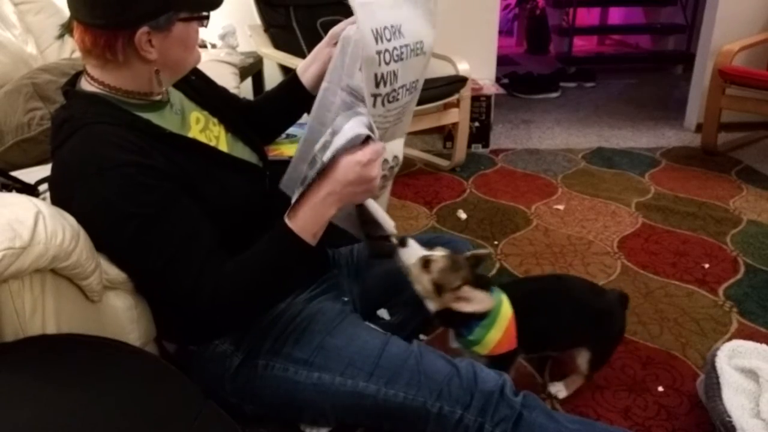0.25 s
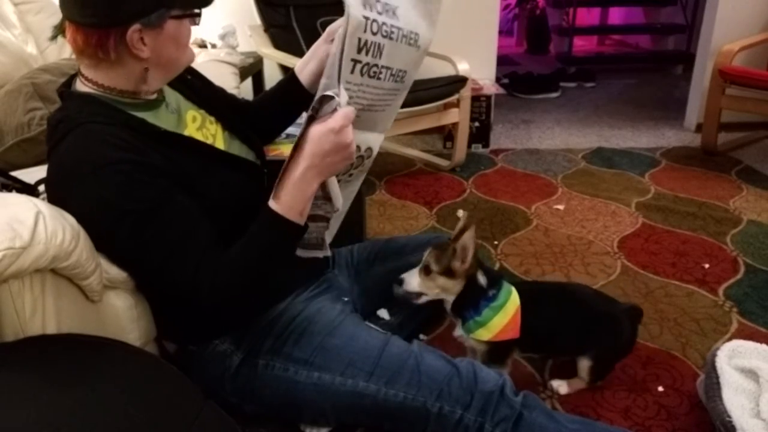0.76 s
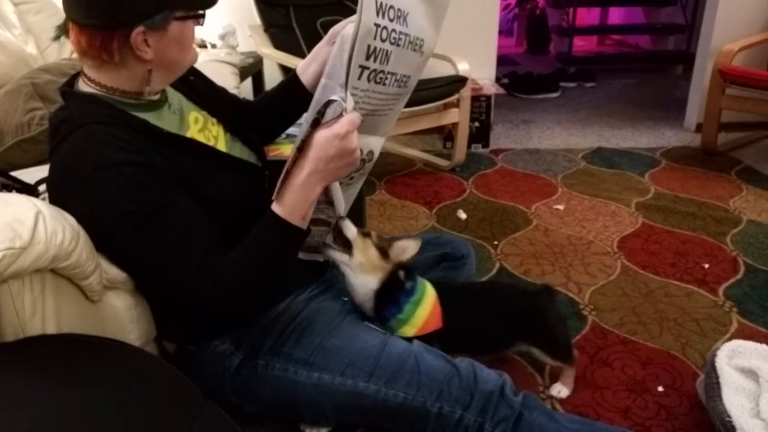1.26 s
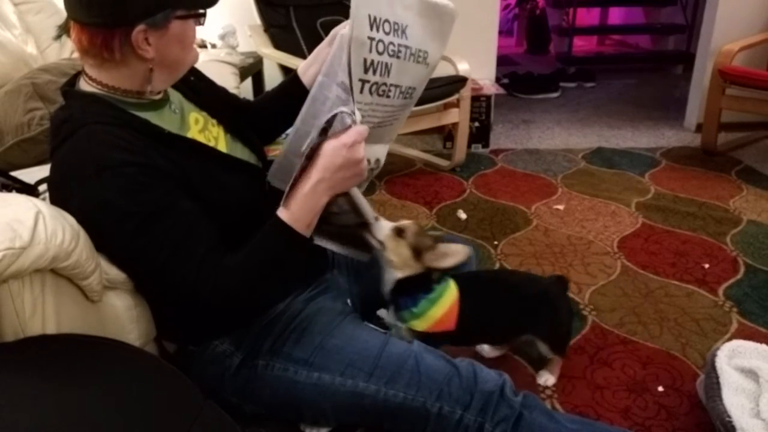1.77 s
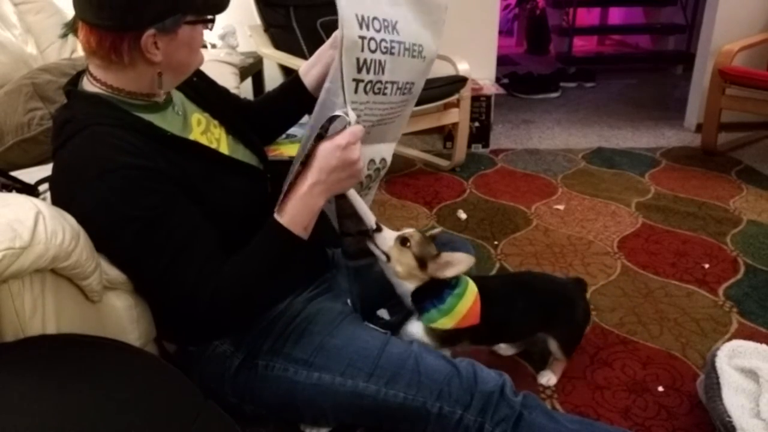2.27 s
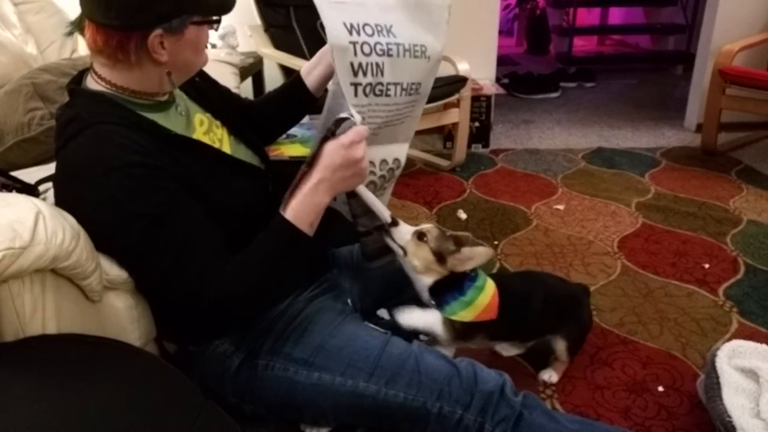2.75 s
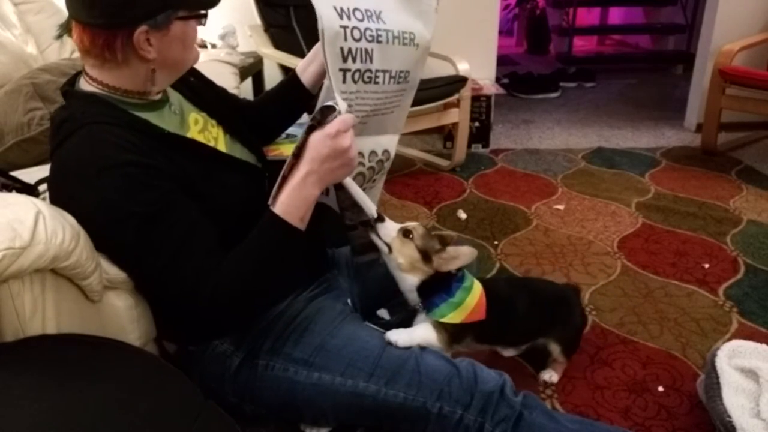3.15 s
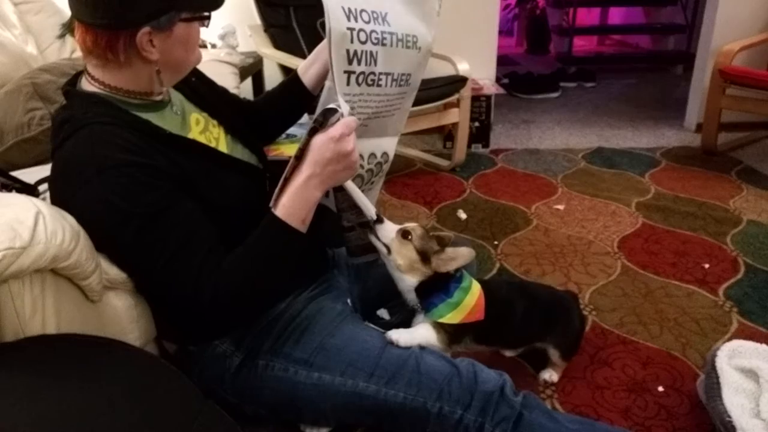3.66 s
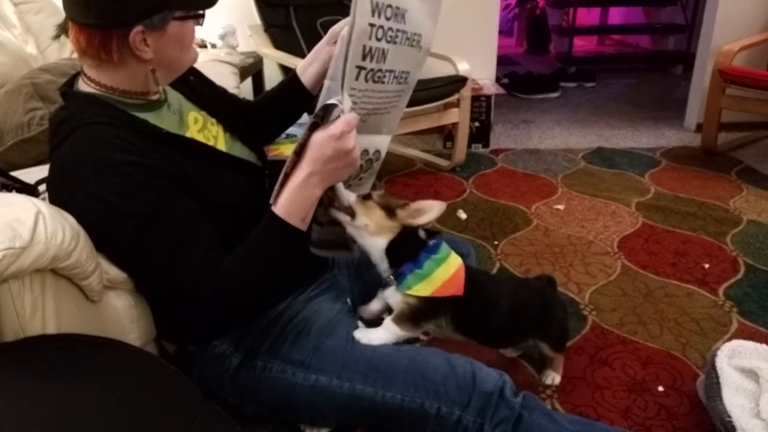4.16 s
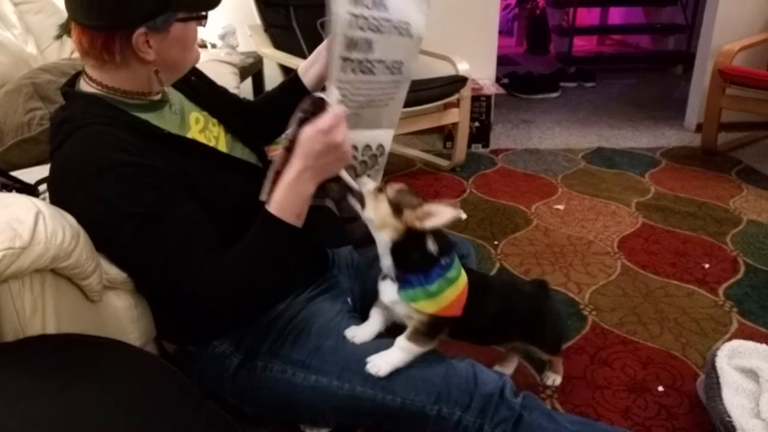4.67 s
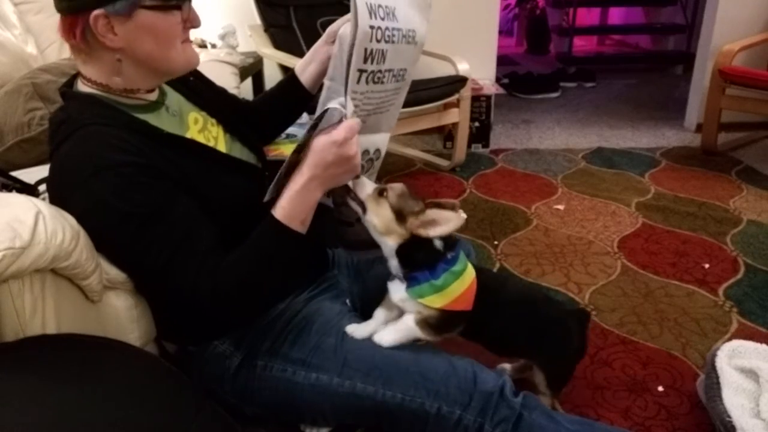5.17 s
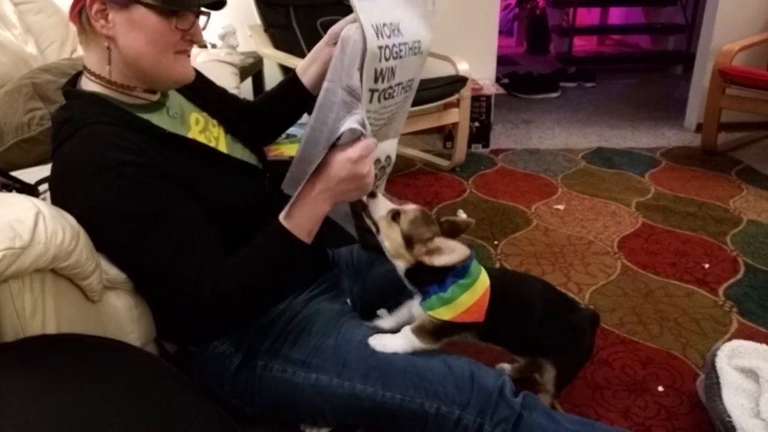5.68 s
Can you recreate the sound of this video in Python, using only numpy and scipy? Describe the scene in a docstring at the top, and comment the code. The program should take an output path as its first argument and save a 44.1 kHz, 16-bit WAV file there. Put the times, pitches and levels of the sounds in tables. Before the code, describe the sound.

In a living room, a small metal tag tinkles faintly and a puppy tears a strip off a newspaper in one quick rip. The sheet is then tugged and crumpled in bursts of rustling. After a short lull comes a denser run of crackles and sharp snaps as the paper is bitten. Soft, dull thuds come now and then, over a low hum, rumble and microphone hiss.

```python
"""A carpeted living room, where a puppy tugs at a newspaper that someone holds. A strip rips off in a dense
run of breaking fibres; then the sheet is pulled, crumpled and bitten, crackling with tiny fractures and
buckling with sharp snaps. A small metal tag tinkles faintly, and soft shoves thud against lap and floor.
The walls answer the paper and the tag; underneath lie a low appliance hum, rumble and microphone hiss."""
import sys
import numpy as np
from scipy import signal
from scipy.fft import rfft, irfft, next_fast_len
from scipy.io import wavfile
from scipy.ndimage import map_coordinates

SR = 44100
rng = np.random.default_rng(int(sys.argv[2]) if len(sys.argv) > 2 else 0)


def int16_out(signal):
    """Quantize to a 16-bit WAV file."""
    q = np.round(np.clip(np.atleast_2d(signal).T, -1, 1) * 32767)
    wavfile.write(sys.argv[1], SR, q.astype(np.int16))


N = 261072
TIME = np.arange(N) / SR

# tone of the hiss and of the low rumble: frequency_hz, density_db
HISS_EQ = [(120, -18), (200, -9), (320, -4), (500, -7), (800, -9.5), (1500, -13), (3500, -14.5),
           (8000, -14.5), (15700, -15)]
RUMBLE_EQ = [(7.1, -17.5), (12, 6), (26, -8.5), (43, -12), (75, -11.5), (97, -17), (141, -19.5),
             (300, -24.5), (390, -67.5), (660, -120)]
# partials of the appliance hum: pitch_hz, level_db
HUM_PARTIALS = [(73, -78), (145.6, -76), (219, -100.5)]
# the sheet stirring in the hands: start_s, end_s, level_db
SHEET_STIRS = [(0.0, 0.9, -69), (1.0, 2.453, -76), (4.203, 5.92, -70.5)]
# pulls on the sheet, each a swell and a fade: peak_s, rise_s, fall_s, level_db, brightness_db
SHEET_PULLS = [(0.375, 0.1, 0.13, -64, 4), (0.503, 0.012, 0.036, -62, 5.5), (0.96, 0.05, 0.14, -70, 2),
               (1.18, 0.037, 0.061, -75.5, 9), (1.616, 0.037, 0.06, -64, -15), (1.83, 0.13, 0.13, -57, 1.5),
               (1.94, 0.055, 0.092, -45.5, -1.5), (2.02, 0.042, 0.05, -44, -3),
               (2.1, 0.035, 0.062, -48, -0.5), (2.17, 0.054, 0.18, -60, 1.5),
               (2.72, 0.058, 0.078, -62.5, -5.5), (2.775, 0.15, 0.12, -62, 3),
               (2.92, 0.038, 0.071, -59, 1.5), (4.19, 0.11, 0.1, -68.5, 1),
               (4.46, 0.025, 0.063, -57.5, 1.5), (4.65, 0.06, 0.072, -66, -7),
               (4.715, 0.025, 0.026, -70, 7), (4.81, 0.06, 0.11, -72, -16), (5.065, 0.053, 0.11, -61.5, -2),
               (5.435, 0.026, 0.044, -64.5, 5.5), (5.63, 0.047, 0.034, -57, -1),
               (5.715, 0.025, 0.027, -67.5, -5), (5.8, 0.018, 0.031, -64.5, 1), (5.89, 0.02, 0.04, -67, 0)]
# the paper's three voices, from wide panels through creases to single fibres: frequency_hz, density_db
FLUTTER_EQ = [(40, -10), (120, -4.5), (280, -1.5), (480, 2), (650, 0.5), (900, -1), (1400, -1), (2100, -3),
              (3200, -11), (7000, -49)]
CRINKLE_EQ = [(600, -48.5), (1500, -4), (2400, 1), (3400, 3), (4600, -0.5), (6500, -7), (9000, -17.5),
              (16000, -49)]
FIZZ_EQ = [(2500, -28), (5000, -2), (6800, 1), (8500, 1.5), (10500, 1), (13000, -2), (16000, -4)]
# the slack sheet flapping: frequency_hz, density_db
FLAP_EQ = [(30, -31), (80, 9), (180, 0.5), (380, 4), (600, -18.5), (1500, -51)]
# the sheet buckling: start_s, pop_hz, pop_q, pop_db, crack_db, fizz_db
BUCKLES = [(0.064, 1400, 0.51, -69, -65, -79), (1.645, 1000, 0.7, -66, -55, -75),
           (2.125, 1250, 0.8, -52.5, -51, -73), (2.43, 810, 5.7, -67, -79, -82),
           (2.474, 3060, 4.3, -67, -69, -81.5), (3.233, 1500, 1.0, -80, -71.5, -77),
           (3.493, 980, 0.63, -70, -74, -82), (3.638, 1300, 0.8, -90, -73.5, -74.5),
           (4.289, 1780, 0.38, -61.5, -53, -54.5), (4.335, 1490, 0.3, -57.5, -63, -64),
           (4.407, 885, 0.14, -45.5, -51.5, -49.5), (4.564, 1220, 0.32, -54.5, -54.5, -54),
           (4.614, 1790, 0.96, -56, -66, -65), (4.764, 1700, 0.43, -63.5, -69, -85),
           (5.094, 950, 0.27, -53.5, -56, -62), (5.19, 1010, 1.2, -48, -45, -53),
           (5.315, 900, 0.95, -49, -60, -57.5), (5.507, 1910, 1.4, -66, -63, -74),
           (5.589, 1200, 4.8, -51.5, -55.5, -57.5), (5.623, 1070, 1.8, -59, -60.5, -69),
           (5.783, 1890, 1.3, -62, -73, -82), (5.913, 1240, 10, -53, -64, -67)]
# one crease cracking: ratio_to_centre, density_db
CREASE_EQ = [(.15, -21), (.5, -12), (.78, -2), (1.2, -1.5), (1.8, -4.5), (4, -27)]
# light contacts on the tag: start_s, level_db
TAG_HITS = [(0.1191, -51), (0.1351, -45.5), (0.3574, -51), (0.7864, -58), (2.2874, -51), (2.3017, -61)]
# the tag's ringing modes: pitch_hz, level_db, t60_s
TAG_MODES = [(8450, -17, 0.068), (10400, -26, .12), (15000, 3.5, 0.051)]
# flutter, crinkle and fizz of the rip, a row each: level_db, sag_db_per_s
RIP_LAYERS = [(-46.5, 18), (-39.5, 38), (-36.5, 18)]
# dull shoves against lap and floor: start_s, level_db
SHOVES = [(0.599, -45.5), (1.546, -51.5), (2.537, -54), (4.42, -59), (4.75, -53.5), (5.166, -44)]

RIP_START_S, RIP_FREE_S = 0.578, 0.73  # the strip gives way, then comes free


def amp(db):
    """Decibels to gain."""
    return 10 ** (np.asarray(db) / 20)


def unit(x):
    """Scale to rms 1."""
    return x / np.sqrt(np.mean(x ** 2) + 1e-20)


def wobble(rate):
    """A smooth random curve with rate knots a second."""
    steps = np.arange(0, N / SR * rate + 1, 1 / 8)
    knots = rng.standard_normal(int(steps[-1]) + 4)
    return np.interp(TIME * rate, steps, map_coordinates(knots, [steps]))


def coloured(x, eq, size=4096):
    """Minimum-phase filter through (frequency_hz, level_db) points on a log frequency axis."""
    hz, db = np.transpose(eq)
    curve_db = np.interp(np.log(np.fft.rfftfreq(size, 1 / SR) + 1), np.log(hz + 1), db)
    cepstrum = irfft(np.log(amp(curve_db)))
    cepstrum[1:size // 2] *= 2
    cepstrum[size // 2 + 1:] = 0
    return signal.oaconvolve(x, irfft(np.exp(rfft(cepstrum))))[:len(x)]


def add(track, start_s, sound):
    """Mix a sound into the track from start_s on."""
    part = track[max(round(start_s * SR), 0):][:len(sound)]
    part += sound[:len(part)]


def gate(start_s, end_s, edge_s):
    """Full gain while a movement lasts, with a fade of edge_s on either side."""
    return np.interp(TIME, [start_s - edge_s, start_s, end_s, end_s + edge_s], [0, 1, 1, 0])


def swell(peak_s, rise_s, fall_s, depth_db=13, shape=1.08):
    """A gain of 1 at peak_s, depth_db lower at the ends of rise and fall; shape 1 is pointed, 2 round."""
    away = np.abs(TIME - peak_s) / np.where(TIME < peak_s, rise_s, fall_s)
    return amp(-depth_db * np.minimum(away, 5) ** shape)


def rumble(rest_db=-60, rip_db=-54, shove_trim_db=-7):
    """A low bed that rises as bodies shift, in the rip and around each shove."""
    shoves = [swell(at_s, rise_s=0.14, fall_s=0.14) * amp(db + shove_trim_db) for at_s, db in SHOVES]
    recoil = amp(rip_db) * gate(RIP_START_S, RIP_FREE_S, edge_s=0.026)
    gain = np.sqrt(amp(rest_db) ** 2 + recoil ** 2 + np.sum(np.square(shoves), axis=0))
    return gain * unit(coloured(rng.standard_normal(N), RUMBLE_EQ, size=16384))


def appliance_hum(waver_db=3.0, drift_rad=0.44):
    """Low partials, each wavering a little in level and phase."""
    hum = np.zeros(N)
    for hz, db in HUM_PARTIALS:
        gain = np.sqrt(2) * amp(db + waver_db * wobble(3.88))
        hum += gain * np.sin(2 * np.pi * hz * TIME + drift_rad * wobble(2.85))
    return hum


def room_tone(hiss_db=-65):
    """The bed under the action: steady microphone hiss over rumble and hum."""
    hiss = amp(hiss_db) * unit(coloured(rng.standard_normal(N), HISS_EQ))
    return hiss + rumble() + appliance_hum()


def crackle(eq, per_s, spread_db, clump_db):
    """Tiny fractures of unequal size, louder in clumps; rms 1."""
    at = np.flatnonzero(rng.random(N) < per_s / SR)
    size_db = spread_db * np.minimum(rng.exponential(size=N)[at], 4)
    polarity = np.sign(rng.random(N)[at] - 0.5)
    clicks = np.zeros(N)
    clicks[at] = polarity * amp(size_db + clump_db * wobble(70)[at])
    return unit(coloured(clicks, eq))


def paper(gains, trims_db, per_s, spread_db, clump_db):
    """Panels flutter, creases crinkle and fibres fizz, each as its own stream of fractures."""
    voices = zip(gains, trims_db, (FLUTTER_EQ, CRINKLE_EQ, FIZZ_EQ))
    return sum(gain * amp(db) * crackle(eq, per_s, spread_db, clump_db) for gain, db, eq in voices)


def handling(flutter_tilt=0.63, stir_crinkle_db=-3.5, waver_db=1.8):
    """Flutter, crinkle and fizz gains: pulls over faint stirring; bright pulls trade flutter for fizz."""
    stir = sum(amp(db) * gate(start_s, end_s, edge_s=0.12) for start_s, end_s, db in SHEET_STIRS)
    stir *= amp(waver_db * wobble(12))
    power = np.outer(amp([0, stir_crinkle_db, 0]), stir) ** 2
    for peak_s, rise_s, fall_s, db, bright_db in SHEET_PULLS:
        balance = amp([db - flutter_tilt * bright_db, db, db + bright_db])
        power += np.outer(balance, swell(peak_s, rise_s, fall_s)) ** 2
    return np.sqrt(power)


def rustle(flap_db=-12):
    """Pulls crumple the sheet in a loose crackle; the slack sheet also flaps as a whole."""
    gains = handling()
    flap = amp(flap_db) * gains[0] * crackle(FLAP_EQ, per_s=600, spread_db=0.5, clump_db=4.5)
    return flap + paper(gains, trims_db=(1.37, 1, 2), per_s=2200, spread_db=4, clump_db=2.5)


def wall_echoes(count, arrival_s=0.011, near_db=-8, body_t60_s=0.26, treble_t60_s=0.19, split_hz=6000):
    """Room tails of energy 1: weak echoes off near furniture, then the dense return from the walls."""
    t = np.arange(SR // 4) / SR
    noise = rng.standard_normal((count, len(t)))
    body = signal.lfilter(*signal.butter(1, split_hz, fs=SR), noise)
    tails = body * amp(-60 * t / body_t60_s) + (noise - body) * amp(-60 * t / treble_t60_s)
    tails *= amp(np.interp(t, [0, arrival_s / 2, arrival_s], [near_db, near_db, 0]))
    return tails / np.linalg.norm(tails, axis=1, keepdims=True)


def in_room(x, wet_db, size=2500):
    """A moving source meets a new pattern of echoes every moment; energy is kept."""
    pieces = np.pad(x, (0, -N % size)).reshape(-1, size)
    tails, wet = wall_echoes(len(pieces)), np.zeros(N)
    for k in np.flatnonzero(pieces.any(axis=1)):
        add(wet, k * size / SR, signal.fftconvolve(pieces[k], tails[k]))
    return (x + amp(wet_db) * wet) / np.hypot(1, amp(wet_db))


def snaps(pop_trim_db=1, fizz_trim_db=1.5, wet_db=4.5, rise_s=0.001, crack_t60_s=0.01):
    """A panel flips through: it pops for a few cycles while its crease cracks and fibres break."""
    track, t = np.zeros(N), np.arange(SR // 20) / SR
    flip = signal.unit_impulse(len(t))
    for start_s, pop_hz, pop_q, pop_db, crack_db, fizz_db in BUCKLES:
        panel = signal.lfilter(*signal.iirpeak(pop_hz, max(pop_q, pop_hz / SR * 10), SR), flip)
        pop = amp(pop_db + pop_trim_db) * unit(coloured(panel, FLUTTER_EQ))
        crack_hz = 3460 * 2 ** ((crack_db + 55.5) / 55)  # harder is brighter: an octave per 55 dB
        crease_eq = [(ratio * crack_hz, db) for ratio, db in CREASE_EQ]
        bright_layers = [(crease_eq, crack_db), (FIZZ_EQ, fizz_db + fizz_trim_db)]
        fractures = rng.standard_normal(len(t)) * (1 - np.exp(-t / rise_s)) * amp(-60 * t / crack_t60_s)
        crack = sum(amp(db) * unit(coloured(fractures, eq)) for eq, db in bright_layers)
        add(track, start_s, pop + crack)
        # the walls gather what the sheet sends in all directions, so their colour is even
        sends = [pop] + [amp(db) * unit(coloured(flip, eq)) for eq, db in bright_layers]
        echoes = signal.fftconvolve(sends, wall_echoes(len(sends)), axes=1).sum(axis=0)
        add(track, start_s, amp(wet_db) * echoes)
    return track / np.hypot(1, amp(wet_db))


def tag_tinkle(trim_db=2, scatter_db=0.99):
    """Each light contact rings the metal tag's high modes at new strengths."""
    track, t = np.zeros(N), np.arange(SR // 4) / SR
    for start_s, hit_db in TAG_HITS:
        ring = sum(amp(db + rng.normal(0, scatter_db) - 60 * t / t60_s) * np.sin(2 * np.pi * hz * t)
                   for hz, db, t60_s in TAG_MODES)
        add(track, start_s, amp(hit_db + trim_db) * ring)
    return track


def rip(release_db_per_s=334, jerk_db=7, jerk_s=0.013, low_cut_hz=750):
    """Fibres break in a dense run that slackens until the strip is free; the taut sheet has little bass."""
    age = np.maximum(TIME - RIP_START_S, 0)
    release = amp(-release_db_per_s * np.maximum(TIME - RIP_FREE_S, 0))
    tearing = gate(RIP_START_S, N / SR, edge_s=0.0091) * release
    flutter, crinkle, fizz = [tearing * amp(db - sag * age) for db, sag in RIP_LAYERS]
    flutter *= amp(jerk_db * np.exp(-age / jerk_s))  # the first jerk shakes the whole sheet
    run = paper((flutter, crinkle, fizz), trims_db=(3.5, 0, 1), per_s=7000, spread_db=2, clump_db=4)
    return signal.lfilter(*signal.butter(1, low_cut_hz, "highpass", fs=SR), run)


def thuds(trim_db=-2, pitch_hz=42, swell_s=0.019):
    """Soft shoves against the lap and floor: one low push each."""
    track, t = np.zeros(N), np.arange(SR // 3) / SR
    push = np.sin(2 * np.pi * pitch_hz * t) * t / swell_s * np.exp(1 - t / swell_s)
    for start_s, db in SHOVES:
        add(track, start_s, amp(db + trim_db) * push)
    return track


def scene():
    """One microphone hears everything, alike in both channels."""
    mono = in_room(rip() + rustle() + tag_tinkle(), wet_db=1.5) + snaps() + thuds() + room_tone()
    return np.array([mono, mono])


def record(dry, top_hz=15850):
    """A brick-wall high cut takes the top off the mix."""
    size = next_fast_len(N + SR // 2)
    passband = np.fft.rfftfreq(size, 1 / SR) < top_hz
    return irfft(rfft(dry, size) * passband, size)[:, :N]


dry = scene()
out = record(dry)
int16_out(out)
```